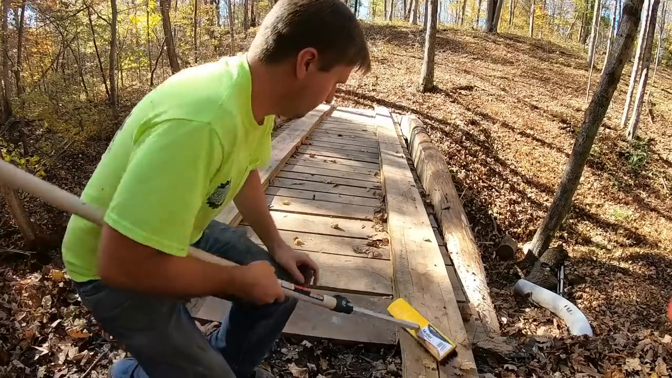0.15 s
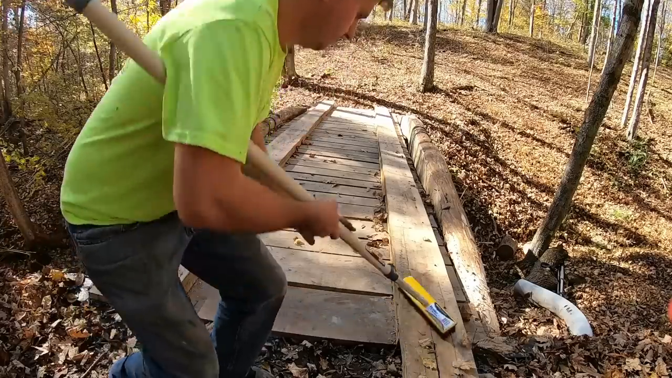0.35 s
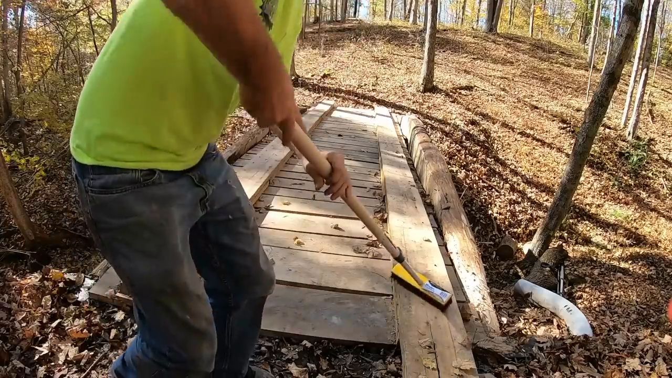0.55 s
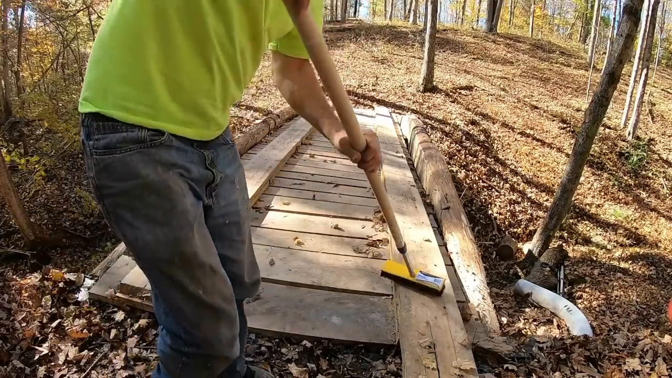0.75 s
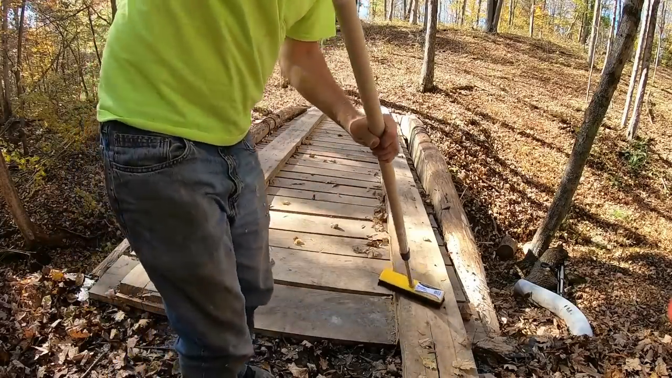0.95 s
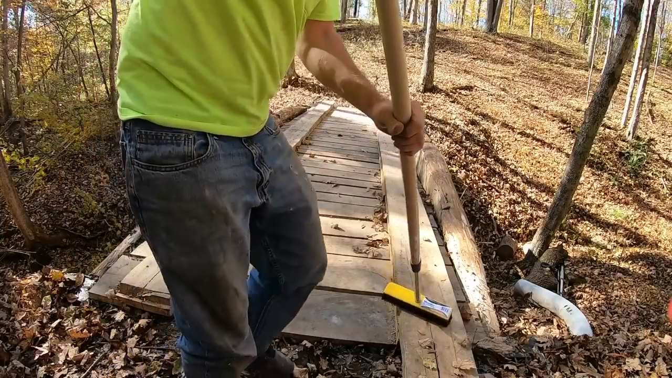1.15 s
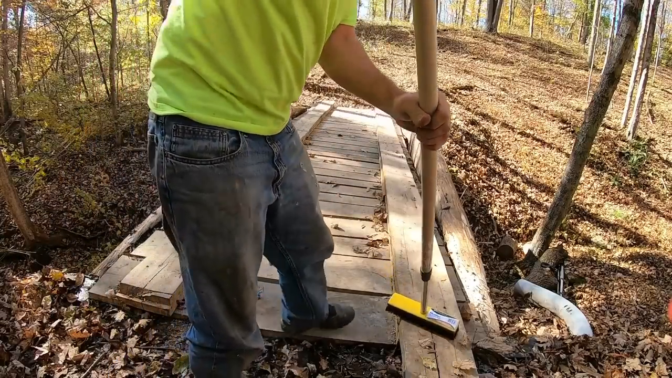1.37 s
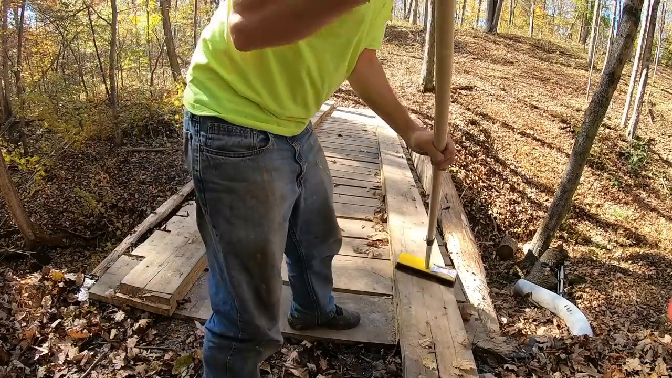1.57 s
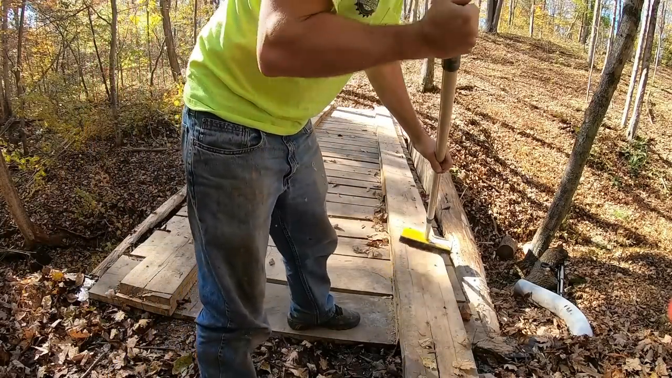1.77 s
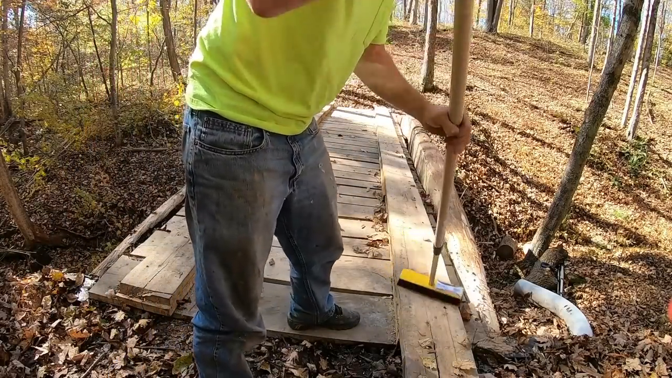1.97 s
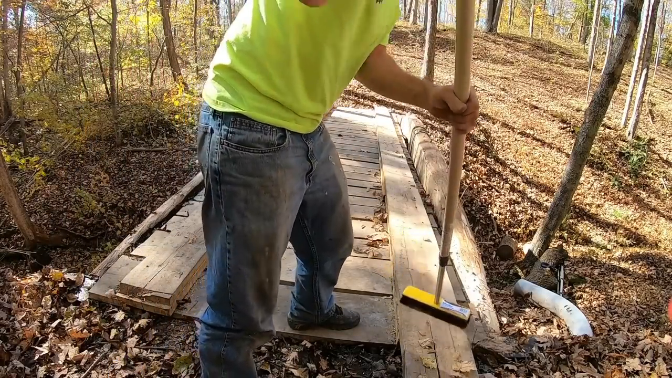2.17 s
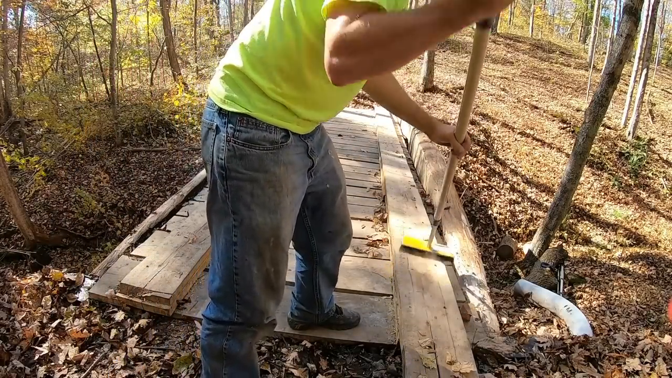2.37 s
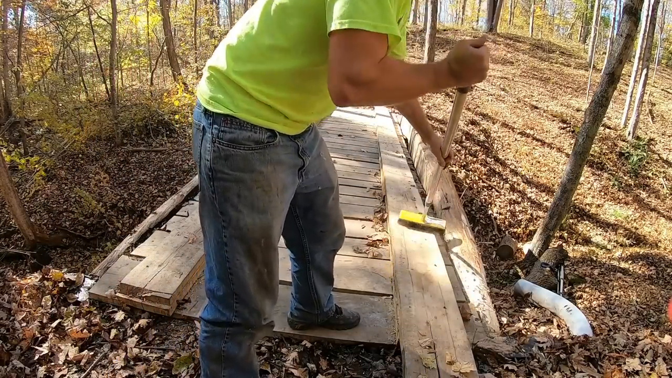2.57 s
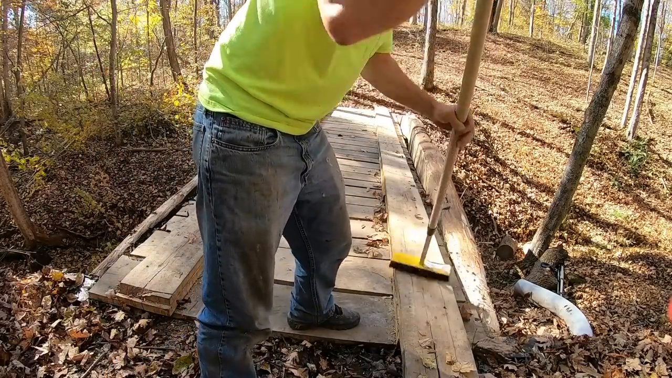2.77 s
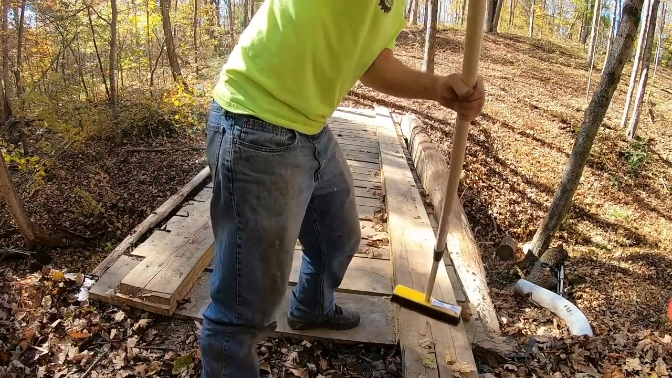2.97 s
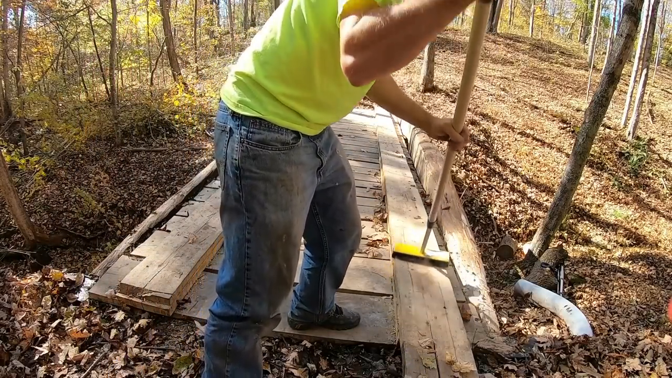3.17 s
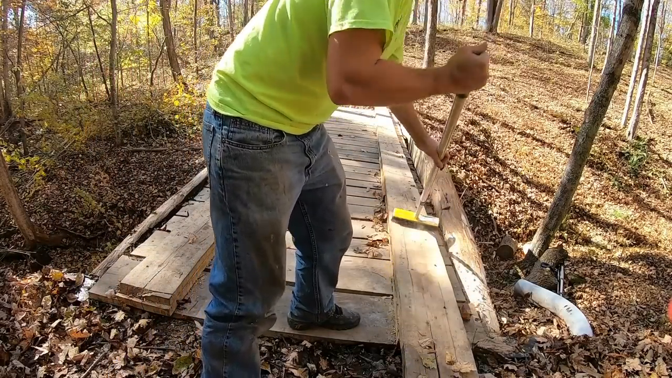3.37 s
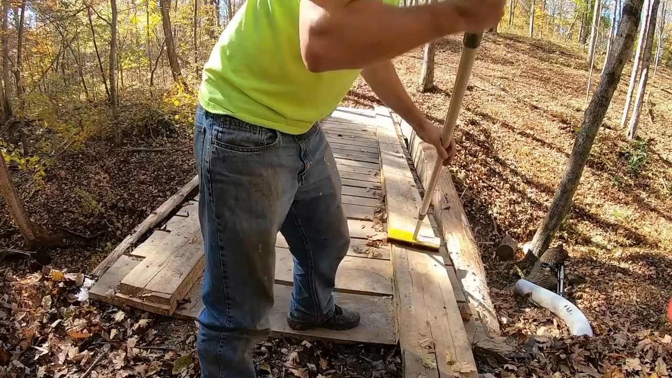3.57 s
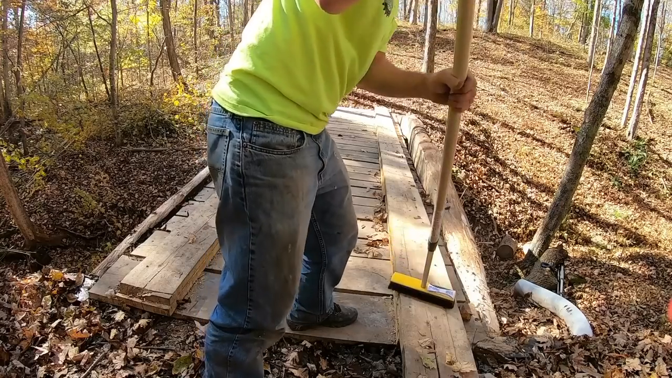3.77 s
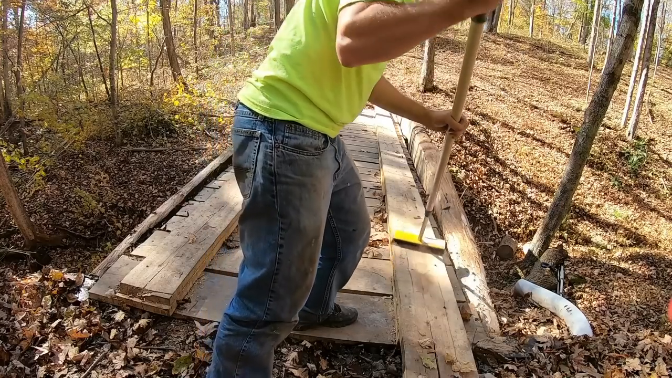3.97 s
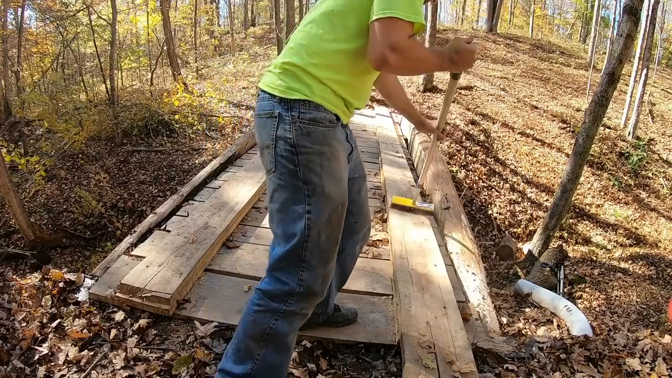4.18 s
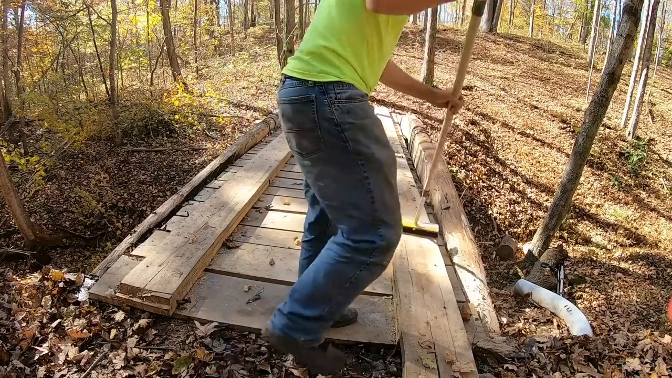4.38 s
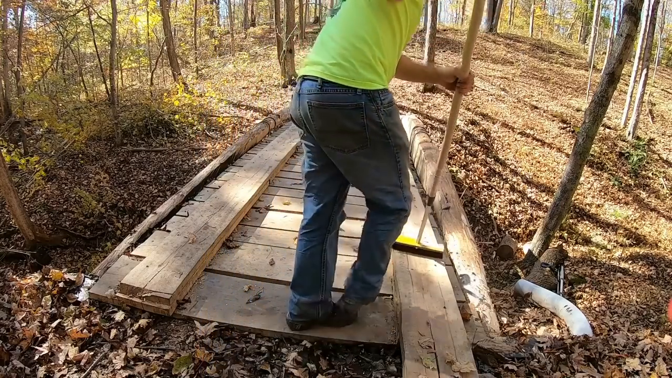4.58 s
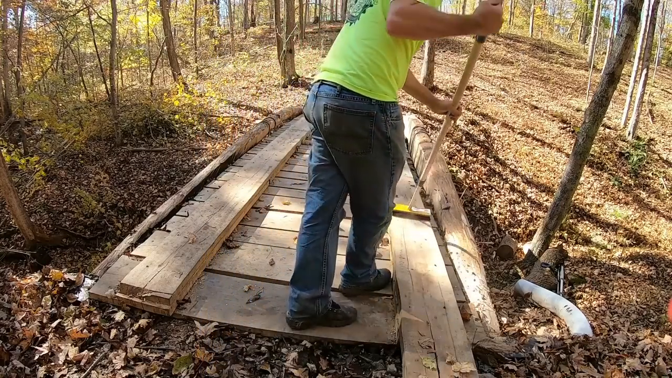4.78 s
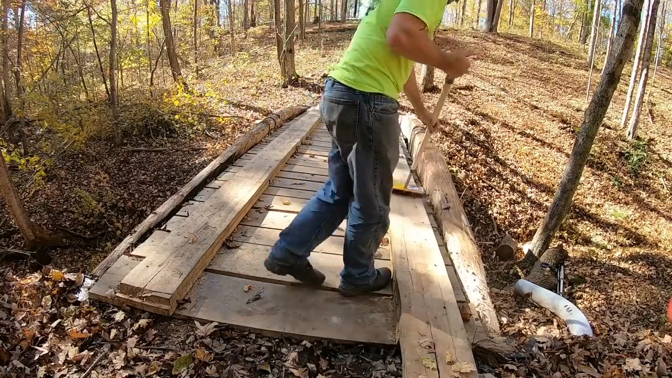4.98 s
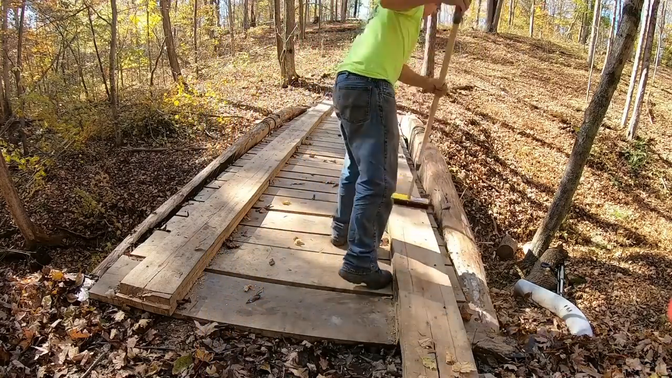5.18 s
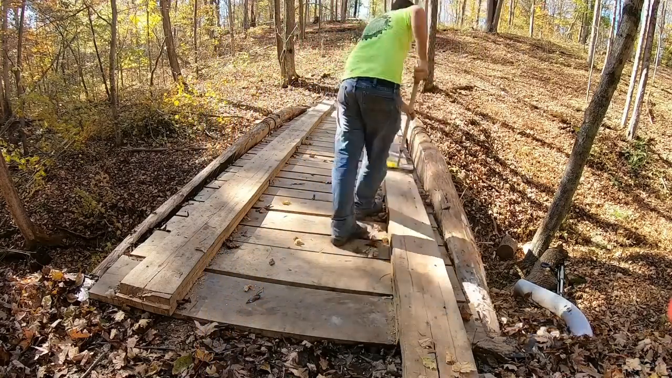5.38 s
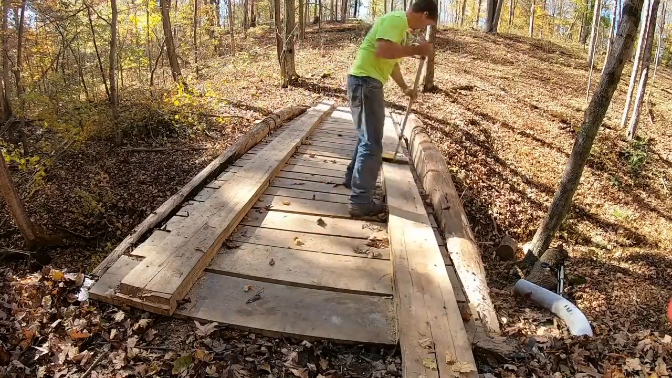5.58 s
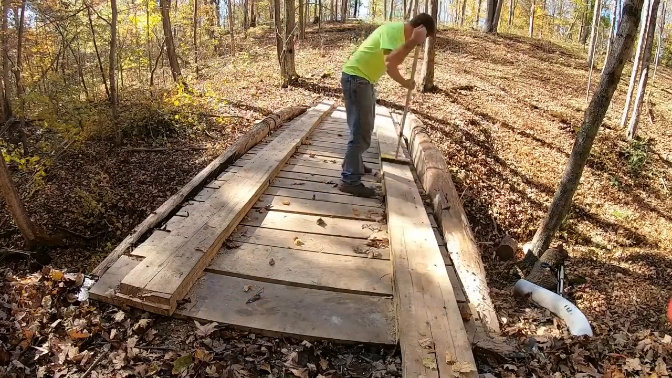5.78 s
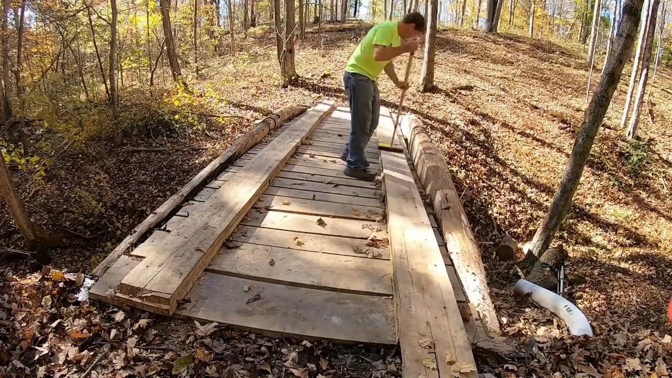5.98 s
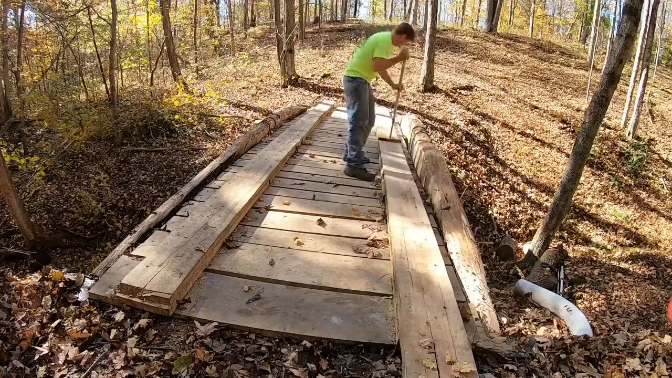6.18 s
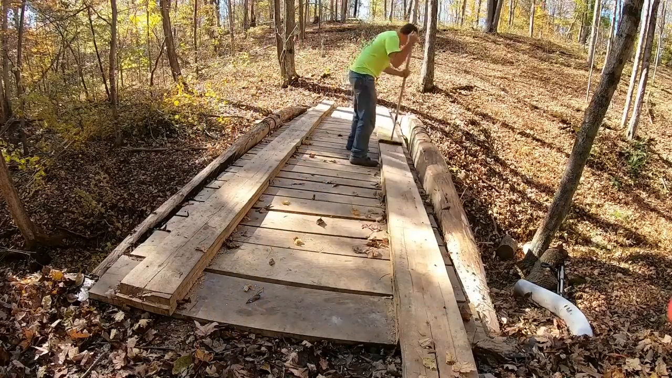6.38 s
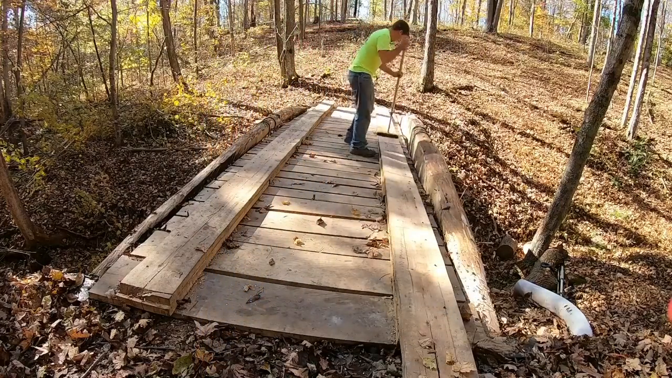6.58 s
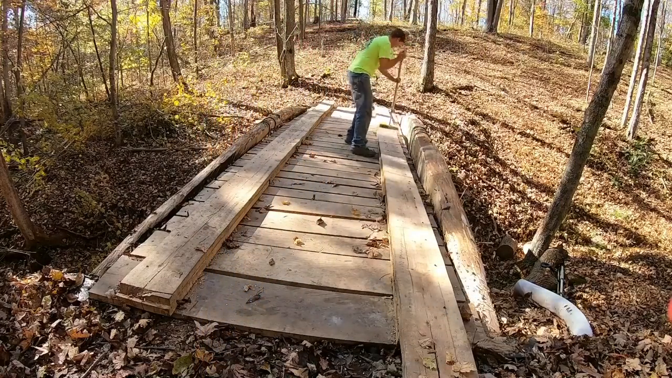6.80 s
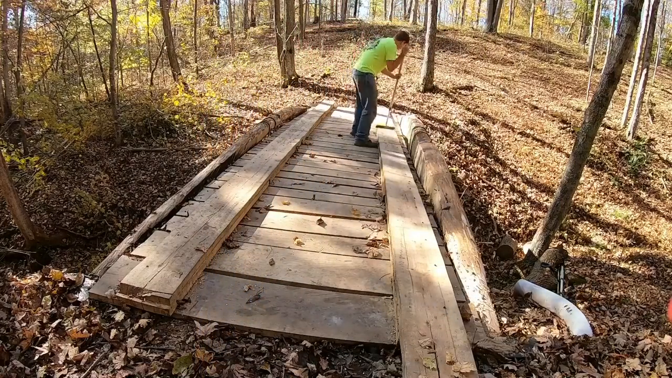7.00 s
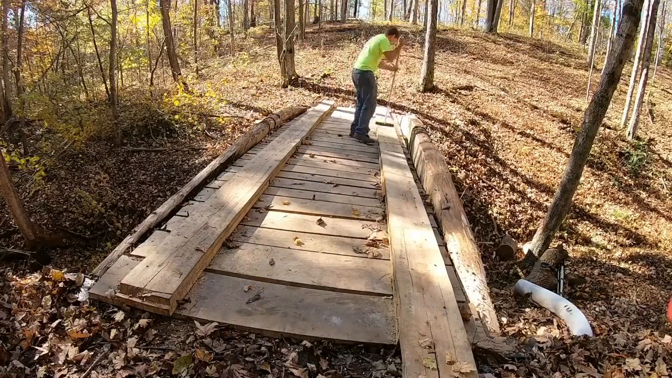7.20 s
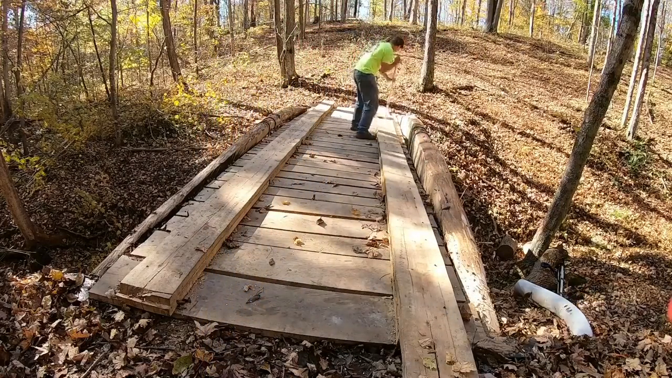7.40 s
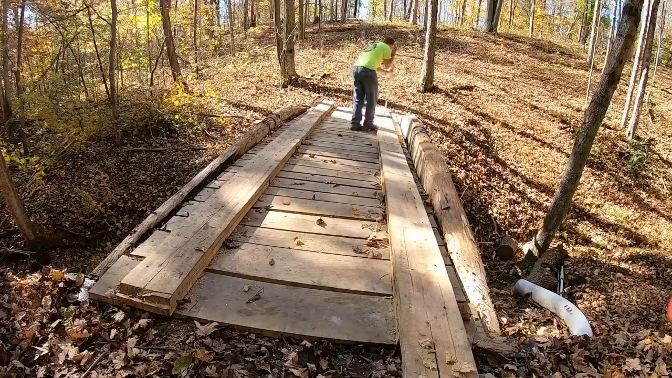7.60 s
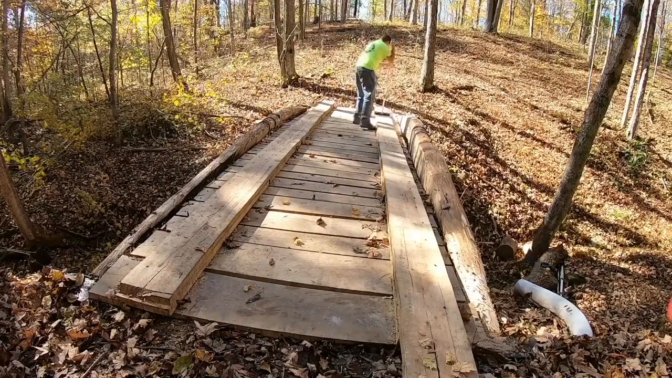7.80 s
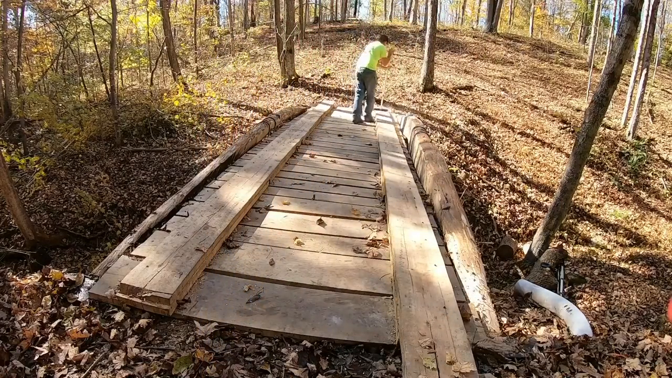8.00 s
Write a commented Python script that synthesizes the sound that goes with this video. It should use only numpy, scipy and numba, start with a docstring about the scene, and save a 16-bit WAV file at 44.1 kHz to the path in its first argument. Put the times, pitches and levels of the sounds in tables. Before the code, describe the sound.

A stiff broom head rattles down onto the planks of a wooden footbridge, then scrubs back and forth in long, hissing, raspy strokes close to the microphone and slightly to the right. After a tiny dropout, quicker, shorter strokes continue from further away and gradually weaken. Boots thud softly on the boards now and then, with faint woodland air and leaves behind.

```python
"""A stiff deck broom scrubs the planks of a footbridge in a wood, to the right of a small stereo camera.
The head rattles down onto the deck and long strokes follow close to the microphone; after a brief
drop-out, a quick run of short strokes comes from further off. Bristle tips slip in dense ticks that
merge into a hiss, the scraped plank rasps, and boots thud on the deck. Air and leaves lie behind."""
import sys
import numpy as np
from scipy import signal
from scipy.io import wavfile
from scipy.ndimage import uniform_filter1d
from numba import njit

SR = 44100
rng = np.random.default_rng(int(sys.argv[2]) if len(sys.argv) > 2 else 0)


def master(y):
    """Save y as 16-bit WAV."""
    cut = np.clip(np.atleast_2d(y).T, -1, 1)
    pcm = np.round(cut * 32767)  # scale
    wavfile.write(sys.argv[1], SR, pcm.astype(np.int16))


N = 355005
SAG_S, CUT_S, RETURN_S = 4.964, 4.976, 4.992  # the drop-out between the close and the far strokes

# Long strokes by the microphone, pushed and pulled in turn: (start [s], fastest [s], end [s], level [dB],
# plank offset [dB], body offset [dB], brightness at the end [Hz])
LONG_STROKES = [(1.417, 1.594, 1.813, -36.5, -17, -6.5, 6400), (1.842, 2.04, 2.144, -38.5, -19.5, -8, 6930),
                (2.149, 2.355, 2.592, -36, -19, -8, 6305), (2.631, 2.834, 2.982, -38.5, -18, -7.5, 6895),
                (2.982, 3.178, 3.464, -36, -17.5, -7, 6290), (3.492, 3.726, 3.812, -39, -19, -9, 6800),
                (3.826, 3.949, 4.288, -35.5, -18, -8, 6274), (4.298, 4.499, 4.598, -42, -16, -7, 6540),
                (4.609, 4.73, 5.013, -37, -15.5, -7.5, 6250)]


def undb(db):
    """Gain of a level in dB."""
    return 10 ** (np.asarray(db) / 20)


def unit(x):
    """Scaled to rms 1."""
    return x / np.sqrt(np.mean(x ** 2))


@njit
def bandpass(x, hz, width):
    """State-variable band-pass with a moving centre, gain 1 at the centre."""
    y = np.empty(len(x))
    band_state, low_state, g, damping, last_hz = 0., 0., 0., 0., 0.
    for i in range(len(x)):
        if hz[i] != last_hz:
            g, damping, last_hz = np.tan(np.pi * hz[i] / SR), width / hz[i], hz[i]
        v = (band_state + g * (x[i] - low_state)) / (1 + g * (g + damping))
        band_state = 2 * v - band_state
        low_state += 2 * g * v
        y[i] = damping * v
    return y


def steep_band(x, hz, width, passes):
    """Repeated band-pass, scaled to rms 1."""
    for _ in range(passes):
        x = bandpass(x, hz * np.ones(len(x)), width)
    return unit(x)


def wander(rate):
    """Random levels held 1 / rate s and smoothed twice; spread near 1."""
    hold = int(SR / rate)
    steps = np.repeat(rng.standard_normal(N // hold + 1), hold)
    return 1.45 * uniform_filter1d(uniform_filter1d(steps, hold), hold)[:N]


def stereo_band(size, hz, width, correlation, flicker_db):
    """A flickering band of noise, scaled by size, with a shared and an opposed part at the two mics."""
    hz, correlation = np.clip(hz, 20., .45 * SR), np.clip(correlation, -1, 1)
    noises = size * rng.standard_normal((2, N))
    mid, side = (steep_band(x, hz, 2. * width, passes=3) for x in noises)  # three passes halve the width
    pair = np.sqrt((1 + correlation) / 2) * mid + np.sqrt((1 - correlation) / 2) * np.array([side, -side])
    return pair * undb(flicker_db * wander(25))


def colour(size, bands, flicker_db):
    """Stereo noise bands summed to rms 1. Band columns:
    (centre [Hz], width [Hz], left [dB], right [dB], correlation, right lag [samples])."""
    out = np.zeros((2, N))
    for hz, width, left_db, right_db, correlation, lag in bands:
        left, right = stereo_band(size, hz, width, correlation, flicker_db)
        out += [undb(left_db) * left, undb(right_db) * np.roll(right, round(lag))]
    return unit(out)


def notch(pair, notches, shift=1):
    """Hollows in the spectrum, moved by the ratio shift. Notch columns:
    (centre [Hz], width [Hz], left depth [0-1], right depth [0-1], slide exponent)."""
    for hz, width, *depths, slide in notches:
        centre = hz * shift ** slide * np.ones(N)
        pair = np.array([x - depth * bandpass(x, centre, float(width)) for x, depth in zip(pair, depths)])
    return pair


def air_and_leaves(t):
    """The wood all around: half-octave bands that swell together and flicker alone."""
    # Spectrum of the wood: (frequency [Hz], relative density [dB])
    spectrum = [(110, -30), (150, 3), (250, -6.5), (500, -9), (1000, -11.5), (1600, -8), (3500, -6.5),
                (7000, -14.5), (10000, -27), (14000, -58)]
    points_hz, points_db = np.transpose(spectrum)
    out, swell_db = 0, wander(0.17)
    for hz in 110 * 2 ** np.arange(0, 7.1, .5):
        db = np.interp(np.log(hz), np.log(points_hz), points_db) + 10 * np.log10(hz) + swell_db
        out = out + undb(db) * stereo_band(1, hz, hz / 3, correlation=0.78, flicker_db=5.5)
    return unit(out) * undb(np.where(t < CUT_S, -65, -68)) * undb([[-.7], [.7]])


def rumble(t):
    """Low puffs, like wind on the microphone, that swell fast and die slower over a faint base."""
    # Puffs: (time [s], level [dB])
    puffs = [(0.56, -63), (0.92, -61), (1.48, -68), (1.73, -69), (2.24, -62.5), (2.51, -70.5), (2.8, -70),
             (3.23, -69.5), (3.4, -78), (3.99, -76), (4.5, -74), (4.8, -65), (5.38, -84), (6.34, -77),
             (5.63, -79), (5.9, -78), (7.1, -75), (7.35, -79), (7.7, -79), (7.95, -79)]
    # Bass of the puffs: band columns as in colour()
    bands = [(35, 19, -12, -9, 0.7, 0), (58.5, 12.5, -3, -1, 0.84, 0), (74, 13, -6, -3, 0.8, 0)]
    gain, rise_s, fall_s = undb(-84), 0.043, 0.054
    for s, db in puffs:
        gain = gain + undb(db) * np.exp(-np.abs(t - s) / np.where(t < s, rise_s, fall_s))
    return gain * colour(undb(1.7 * wander(6.4)), bands, flicker_db=2.5)


def deck_thuds():
    """Boots and the broom's weight land softly: bursts of broad noise around the pitch of the deck."""
    # Blows on the deck: (time [s], relative level [dB], pitch [Hz])
    blows = [(0.397, -56, 366), (0.541, -66, 366), (0.636, -52, 215), (0.896, -41.5, 198),
             (0.938, -42.5, 224), (1.04, -55.5, 207), (1.199, -50, 215), (1.251, -62, 350),
             (1.459, -45.5, 299), (1.513, -46.5, 180), (2.238, -55.5, 370), (3.019, -53, 179),
             (4.54, -51, 394), (4.746, -53, 377), (4.779, -51, 180), (4.818, -52, 347), (4.858, -55, 196),
             (4.889, -60, 151.9), (4.99, -55, 344.4), (5.088, -53.5, 248), (5.358, -46.5, 200),
             (5.374, -50, 200), (5.649, -53, 393), (5.939, -54, 293), (6.039, -57, 199), (6.318, -55, 353),
             (7.662, -56.5, 205), (7.933, -62.5, 165), (8.018, -66, 165)]
    out, t = np.zeros(N), np.arange(6000) / SR
    rise_s, fall_s = 0.0065, 0.016
    envelope = (1 - np.exp(-t / rise_s)) * np.exp(-t / fall_s)
    envelope *= 0.53 / envelope.max()
    for s, db, hz in blows:
        thud = undb(db) * envelope * steep_band(rng.standard_normal(len(t)), hz, 1.7 * hz, passes=2)
        i = int(s * SR)
        out[i:i + len(t)] += thud[:N - i]
    return out * undb([[-.8], [.8]])


def head_knocks():
    """The head hits the planks and rings, roughened by chatter; each knock has its own brightness."""
    # Contacts: (time [s], level [dB], brightness [dB/octave, neutral at -15.5])
    contacts = [(0.317, -26.5, 1), (0.349, -21.5, -9), (0.389, -31, -9), (0.401, -33, -8),
                (0.411, -33, -17), (0.421, -31, -19), (0.434, -41, -7), (0.453, -44, -14),
                (0.521, -23.5, -12), (0.537, -27, -17), (0.551, -22.5, -15), (0.584, -33, -16),
                (0.597, -44, -7), (0.626, -34, -14), (0.643, -24, -10), (0.653, -31, -19),
                (0.734, -32, -21), (0.889, -50, -13), (0.986, -47, -13), (1.125, -45.5, -18),
                (1.195, -45, -25), (1.204, -41.5, -41), (1.326, -47, -1), (1.428, -36.5, -17),
                (2.473, -35, -10), (2.494, -46.5, -49), (5.395, -50, -15), (6.024, -41.5, -18.5),
                (6.994, -36.5, -8), (7.614, -40, -11)]
    # Modes of the head: (frequency [Hz], relative level [dB], t60 [s])
    modes = [(553, -24, 0.021), (770, -3.5, 0.029), (996, -3, 0.055), (1373, 0, 0.031), (1740, 7.5, 0.019),
             (2140, 5.5, 0.016), (2900, 2, 0.015), (3230, 3, 0.015), (3960, -8.5, 0.017), (4500, -9, 0.011)]
    out, t = np.zeros((2, N)), np.arange(4000) / SR
    hz, mode_db, t60 = np.transpose(modes)[:, :, None]
    low_cut = signal.butter(2, 350, "high", fs=SR, output="sos")  # the knocks are kept above about 350 Hz
    for s, db, brightness in contacts:
        level_scatter, detune, side_scatter = rng.standard_normal((3, len(modes), 1))
        gain = undb(mode_db + 2 * level_scatter + (brightness + 15.5) * np.log2(hz / 1000))
        ring = gain * np.sin(2 * np.pi * hz * (1 + 0.05 * detune) * t) * np.exp(-np.log(1000) * t / t60)
        force = 0.069 * rng.standard_normal(len(t)) * np.exp(-t / 0.0079)  # a few ms of chatter
        force[0] = 1  # the blow itself
        ring = signal.fftconvolve(ring, force[None], axes=1)[:, :len(t)]
        ring = signal.sosfilt(low_cut, ring)
        knock = ring.sum(axis=0)
        # the lower modes tend to be weaker at the right mic
        right = (ring * undb((4 * side_scatter - 2) * (hz < 1500))).sum(axis=0)
        i = int(s * SR)
        out[:, i:i + len(t)] += undb(db) * np.array([undb(.5) * knock, right]) / np.abs(knock).max()
    return out


def bristle_snaps():
    """A bunch of bristles springs free at once: a few ms of broad noise."""
    # Snaps: (time [s], relative level [dB], centre [Hz])
    snaps = [(0.184, -47, 3260), (0.796, -45, 4870), (0.8564, -26, 7330), (0.8906, -25, 7400),
             (0.9074, -24.5, 6900), (1.204, -33, 6160), (1.3276, -41, 3220), (2.4723, -28, 3460),
             (2.483, -26.5, 3800), (2.4914, -24.5, 6210), (2.5114, -33, 6280), (3.1807, -27, 3980),
             (4.3116, -43, 3490), (5.535, -34.5, 7200)]
    out, t = np.zeros((2, N)), np.arange(900) / SR
    decay = np.exp(-t / 0.0041)
    for s, db, hz in snaps:
        shared, left_only = (steep_band(x, hz, 0.49 * hz, passes=2)
                             for x in rng.standard_normal((2, len(t))))
        i = int(s * SR)
        out[:, i:i + len(t)] += undb(db - 8) * decay * np.array([shared + 0.38 * left_only, shared])
    return out


def slips(spread_db, clump_db):
    """Sizes of the ticks of bristle tips letting go: very uneven up to a limit, and in clumps."""
    return undb(spread_db * np.minimum(rng.exponential(size=N), 6) + clump_db * wander(150))


def far_scrubbing(t, tips, grit):
    """Quick strokes further off; the plank fades faster than the bristles as the work moves away."""
    # Short strokes: (peak time [s], relative level [dB], rise scale [s], fall scale [s])
    strokes = [(5.001, -49.5, 0.016, 0.037), (5.05, -46.5, .05, 0.061), (5.107, -41.5, 0.069, .11),
               (5.199, -47.5, .04, .061), (5.251, -46, 0.052, 0.11), (5.35, -51, .05, .05),
               (5.403, -41, 0.056, 0.057), (5.479, -48, 0.045, 0.062), (5.543, -46, .03, 0.086),
               (5.604, -44.5, .052, 0.063), (5.657, -43.5, .053, 0.087), (5.791, -43.5, .11, 0.096),
               (5.875, -50.5, .04, 0.046), (5.927, -44, 0.082, .075), (5.997, -51, .04, 0.03),
               (6.051, -43.5, 0.074, 0.058), (6.168, -44, .086, 0.086), (6.243, -52, .023, 0.034),
               (6.29, -43, 0.038, .05), (6.401, -44, 0.065, 0.084), (6.528, -46, 0.052, 0.061),
               (6.654, -46, 0.11, 0.059), (6.763, -45, .058, .061), (6.892, -48, 0.089, 0.061),
               (7.011, -46.5, .1, .064), (7.137, -48, 0.093, .1), (7.26, -48, 0.065, 0.055),
               (7.386, -49, 0.12, .056), (7.497, -48, .079, .051), (7.611, -44, 0.061, 0.058),
               (7.73, -51, .11, 0.081), (7.839, -50, 0.081, .058), (7.958, -51.5, 0.056, 0.052),
               (8.045, -57.5, 0.031, .05)]
    # Bristles and plank at a distance: band columns as in colour()
    bristle_bands = [(2300, 690, -11.5, -12, 1, 0), (3200, 500, -11.5, -10, 1, 0),
                     (3640, 1090, 0, 0.5, 1, 0), (4940, 1540, -2.5, -7.5, 0.57, 0),
                     (5750, 610, -16, -2, 0.054, 1), (7190, 1320, -12, 2.5, 0.15, 2),
                     (8800, 2160, -7.5, -1, -1.3, 1), (12000, 1300, -30, -17, 0.029, 0),
                     (14300, 1000, -30, -28, -0.041, 0)]
    plank_bands = [(200, 93, -7, -7, 0.85, -7), (370, 160, -7, -6.5, 0.8, 3), (648, 196, -1, 0.5, 1, 12.5),
                   (994, 260, -6, -12, 0.13, 7), (1374, 380, 0.5, 2.5, 0.51, -1), (1830, 420, -4, -2, 1, 3)]
    # Hollows where two paths to the microphone cancel: columns as in notch()
    hollows = [(4250, 400, .5, .4, 0), (5950, 500, .5, .05, 0), (7300, 500, .6, .05, 0),
               (8050, 600, .05, .55, 0), (8550, 400, .45, .05, 0), (10900, 1200, .5, .6, 0)]
    power = np.zeros(N)
    for s, db, rise, fall in strokes:
        away = (t - s) / np.where(t < s, rise, fall)
        bell, skirt = np.exp(-(away / 0.43) ** 2), undb(-19) * np.exp(-(away / 5.3) ** 2)
        power += (undb(db) * (bell + skirt)) ** 2
    hiss = undb(1.5) * notch(colour(tips, bristle_bands, flicker_db=0.95), hollows)
    plank_db = -15.5 - (t - RETURN_S)  # falls 1 dB a second
    plank = undb(plank_db) * colour(grit, plank_bands, flicker_db=3)
    return np.sqrt(power) * (t > CUT_S) * (hiss + plank)


def long_stroke_motion(t):
    """Level, plank and body offsets in dB, and the frequency ratio that follows the broom's place."""
    # Bristles catch (dip) or jerk free (bump): (time [s], level change [dB], half length [s])
    hitches = [(2.49, 3.5, 0.022), (2.737, -5.5, 0.017), (2.77, 1, 0.021), (2.817, -2.5, 0.012),
               (4.41, -6, 0.011)]
    start, fastest, end, level_db, plank_db, body_db, end_hz = np.transpose(LONG_STROKES)
    push_shape, pull_shape = (0.62, 0.82), (0.62, 0.41)  # rise and fall exponents; small is flat-topped
    grip_s, settle_s = 0.036, 0.029
    power = undb(-61) ** 2  # bristles still stir at the turns
    for k, (begin, peak, finish, db) in enumerate(zip(start, fastest, end, level_db)):
        rise = np.sin(np.pi / 2 * np.clip((t - begin) / (peak - begin), 0, 1))
        fall = np.sin(np.pi / 2 * np.clip((finish - t) / (finish - peak), 0, 1))
        grip = np.clip(np.minimum(t - begin, finish - t) / grip_s, 0, 1)
        up, down = pull_shape if k % 2 else push_shape
        power = power + (undb(db) * grip * rise ** up * fall ** down) ** 2
    pole = np.exp(-1 / (settle_s * SR))  # bent bristles straighten after each stroke
    power = power + undb(-13.5) ** 2 * signal.lfilter([1 - pole], [1, -pole], power)
    hitch_db = sum(db * np.exp(-((t - s) / half) ** 2) for s, db, half in hitches)
    stroke_db = 10 * np.log10(power) + hitch_db
    linger_db = 0.48 * (level_db.max() - stroke_db)  # the plank fades less at the turns
    turns = np.arange(len(end) + 1)
    progress = np.interp(t, [start[0], *end], turns)
    progress -= 0.41 * np.sin(2 * np.pi * progress) / (2 * np.pi)  # the broom slows into each turn
    shift = np.interp(progress, turns, [6860, *end_hz]) / 6600  # brightness over its neutral value in Hz
    return stroke_db, np.interp(t, fastest, plank_db) + linger_db, np.interp(t, fastest, body_db), shift


def close_scrubbing(t, tips, grit):
    """Bristle hiss, its 2-3 kHz body and the scraped plank up close: first loose, then pressed down."""
    # The head is lowered, rattles, swipes once and drags into place:
    # (time [s], level [dB], wood offset [dB])
    landing = [(0.0, -70.5, 8), (0.254, -63, -22), (0.314, -47.5, 1), (0.37, -49, 5), (0.422, -49, 9),
               (0.515, -52, -5), (0.525, -49.5, 11), (0.605, -54, 7.5), (0.65, -51.5, 9.5),
               (0.729, -53.5, -2.5), (0.738, -54, 6), (0.785, -67, -5), (0.82, -52, -11), (0.85, -44, -11),
               (0.896, -36, -9.5), (0.962, -51, -2), (1.182, -52.5, -12), (1.208, -49.5, -10.5),
               (1.334, -51, -13.5), (1.38, -59, -11)]
    # Flatter hiss of the loose bristles, rasp of the loose head, plank under pressure:
    # band columns as in colour()
    drag_bands = [(3460, 1000, -6, -6, 1, 0), (4830, 1150, -6, -6, 0.65, 0), (6600, 2500, -8, 1, 0.074, 0),
                  (9030, 1400, -7.5, -2.5, 0.13, 0), (12000, 1500, -29, -19.5, .1, 0),
                  (14400, 1200, -30, -30, 0.13, 0)]
    rasp_bands = [(362, 400, -7, -6, 0.95, -3), (630, 200, -5, -3.5, 0.8, 2), (840, 290, 3, 0.5, 0.74, 9),
                  (1120, 220, -1, -5, 0.28, -3), (1370, 110, -1, -3, .8, -4.5),
                  (1640, 190, -3, -4, 0.74, -3), (2130, 650, -1, -3.5, 0.9, -3.5)]
    plank_bands = [(307, 490, -4.5, -2.5, 0.59, -7), (614, 267, -3, -1.6, 0.75, -0.5),
                   (778, 223, -4.5, 1.5, 1, 8), (1087, 230, -1, -7.5, 0.2, 1),
                   (1500, 930, 2.5, 5.5, 0.27, 1), (1835, 580, 1.5, 5.5, 1, 6)]
    # Pressed bristles, heard via deck and camera body, so the bands slide as the broom moves: the columns
    # of colour(), then (slide exponent, left gain [dB per 10% shift], right gain [dB per 10% shift])
    bristle_bands = [(3787, 930, -10, -10.5, 1, 0, 1.9, -7.5, -9.5),
                     (5170, 830, -12, -10, -0.37, 0, 1.1, 7, 15.5),
                     (6560, 840, -17.5, -3.5, -0.5, 1, 1.24, 4, 3.9),
                     (8000, 770, -23, -9, -0.45, 1, 1.83, 14, -8.5),
                     (9240, 2070, -15.5, -9.5, -0.37, 0, 1.7, -4, -4.5),
                     (11670, 2300, -27, -20, -0.47, 1, 0.92, -9, -11),
                     (13660, 610, -39, -37.5, -0.19, 0, 1.3, 9, 9)]
    # Hollows where two paths to the microphone cancel: columns as in notch()
    hollows = [(1650, 500, .4, .4, .1), (3330, 450, .6, .6, 1.6), (4800, 550, .55, .35, 3.1),
               (7750, 700, .2, .5, .8), (10900, 900, .4, .6, .4), (13100, 900, .5, .7, .1)]
    stroke_db, plank_db, body_db, shift = long_stroke_motion(t)
    tenths = 10 * (shift - 1)
    landing_s, landing_db, wood_db = np.transpose(landing)
    early = t < LONG_STROKES[0][0]
    press_at_s, press_over_s = 1, 0.33
    gain = undb(np.where(early, np.interp(t, landing_s, landing_db), stroke_db)) * (t < CUT_S)
    # plank and body stand out more at the near end of a stroke
    plank_gain = undb(np.where(early, np.interp(t, landing_s, wood_db), plank_db + 10.5 * tenths))
    body_gain = undb(np.where(early, np.where(t < press_at_s, -16, -8), body_db + 9 * tenths))
    sliding = [(hz * shift ** slide, width, left + left_up * tenths, right + right_up * tenths, corr, lag)
               for hz, width, left, right, corr, lag, slide, left_up, right_up in bristle_bands]
    body = body_gain * stereo_band(tips, hz=2680 * shift ** 2.3, width=900, correlation=1, flicker_db=0.2)
    firm = notch(undb(3) * colour(tips, sliding, flicker_db=0.43) + body, hollows, shift)
    firm += plank_gain * colour(grit, plank_bands, flicker_db=3)
    loose = undb(3) * colour(tips, drag_bands, flicker_db=1.5) + body
    loose += plank_gain * colour(slips(spread_db=5, clump_db=3), rasp_bands, flicker_db=2.5)
    pressed = np.clip((t - press_at_s) / press_over_s + .5, 0, 1)
    return gain * (np.sqrt(pressed) * firm + np.sqrt(1 - pressed) * loose)


def scene():
    """The broom on the footbridge, close and then further off, with the wood behind it."""
    t = np.arange(N) / SR
    tips, grit = slips(spread_db=2.5, clump_db=.6), slips(spread_db=3, clump_db=1)
    broom = close_scrubbing(t, tips, grit) + far_scrubbing(t, tips, grit)
    return broom + bristle_snaps() + head_knocks() + deck_thuds() + air_and_leaves(t) + rumble(t)


def record(dry):
    """The camera dips in the bass and cuts the top; the sound drops out briefly between the two parts."""
    # Weak spot in the camera's bass: columns as in notch()
    bass_dip = [(110, 31, .6, 0.53, 0)]
    t, top_hz = np.arange(N) / SR, 15200
    sag = undb(-14) * np.clip((CUT_S - t) / (CUT_S - SAG_S), 0, 1)
    gate = np.where((t > SAG_S) & (t < RETURN_S), sag, 1)
    top_cut = signal.ellip(10, .2, 80, top_hz, fs=SR, output="sos")
    return signal.sosfilt(top_cut, notch(dry, bass_dip) * gate)


dry = scene()
out = record(dry)
master(out)
```